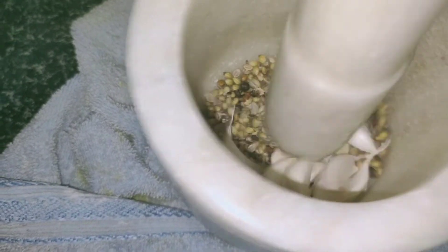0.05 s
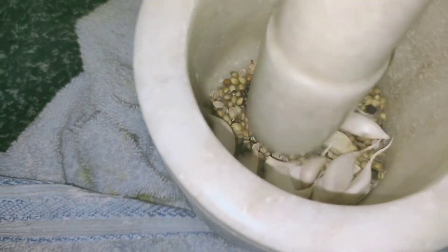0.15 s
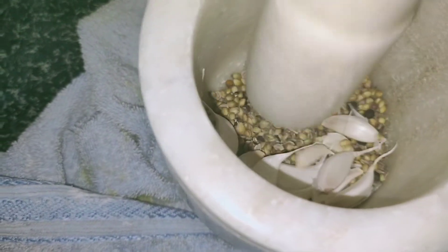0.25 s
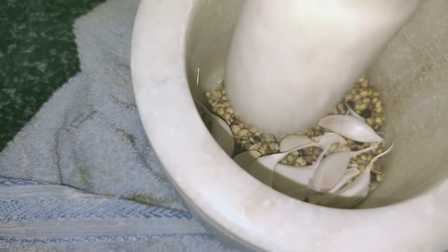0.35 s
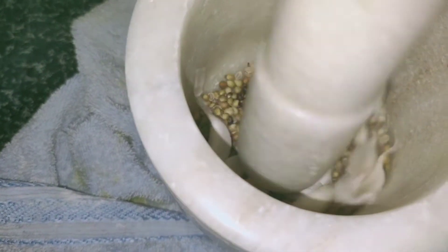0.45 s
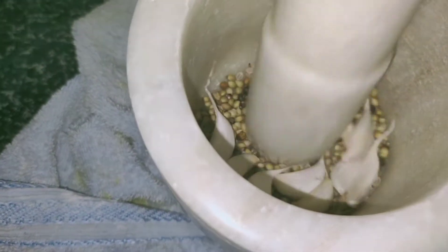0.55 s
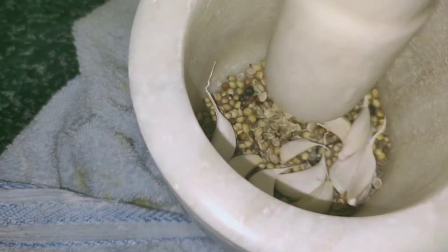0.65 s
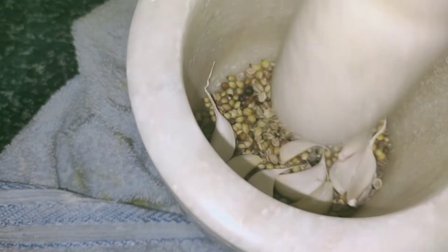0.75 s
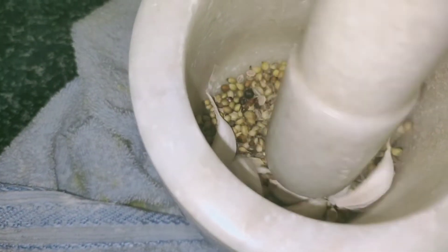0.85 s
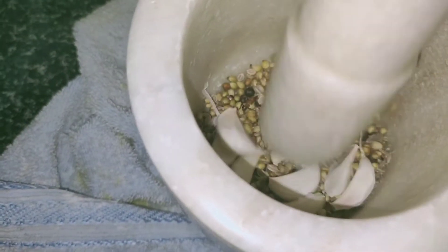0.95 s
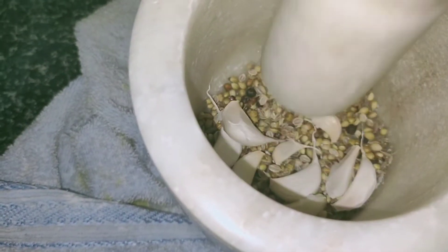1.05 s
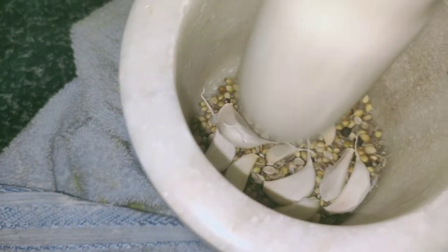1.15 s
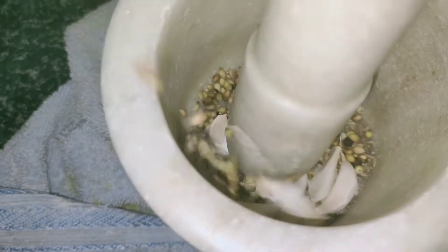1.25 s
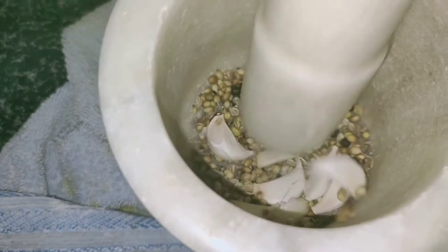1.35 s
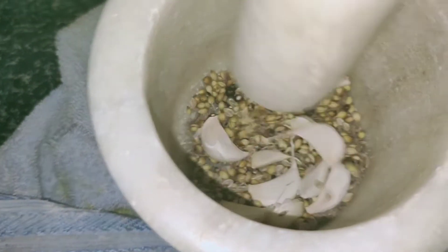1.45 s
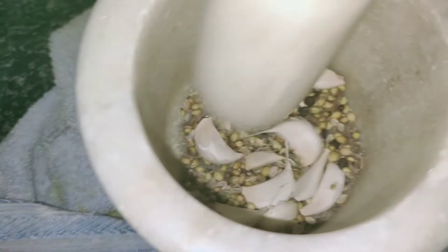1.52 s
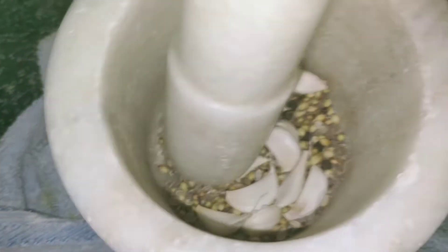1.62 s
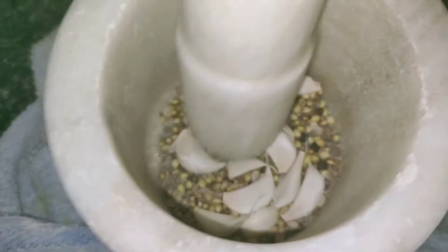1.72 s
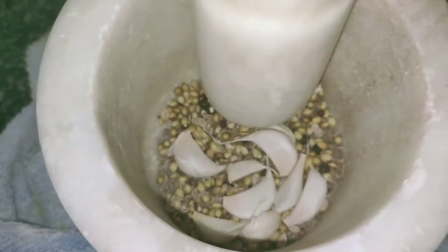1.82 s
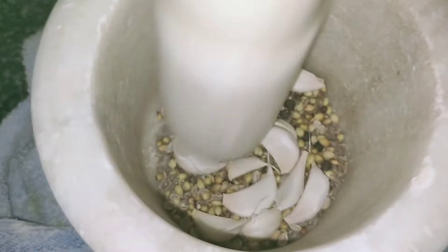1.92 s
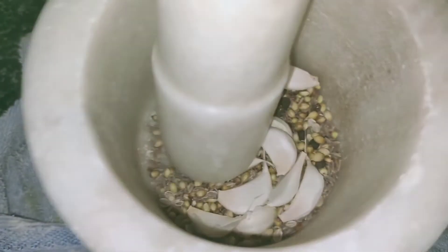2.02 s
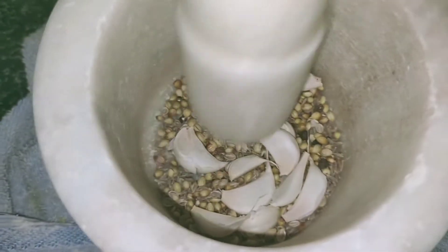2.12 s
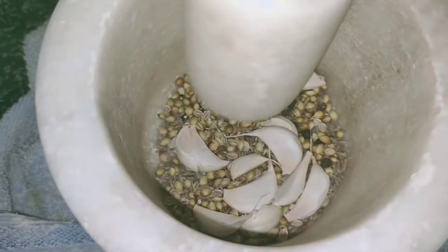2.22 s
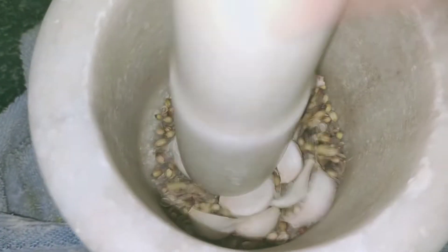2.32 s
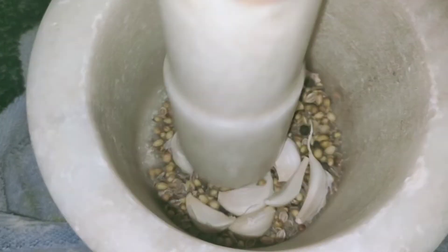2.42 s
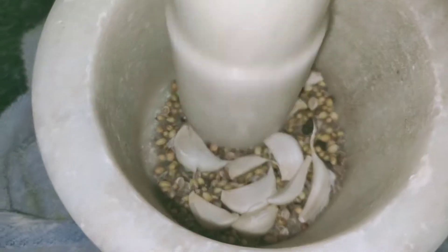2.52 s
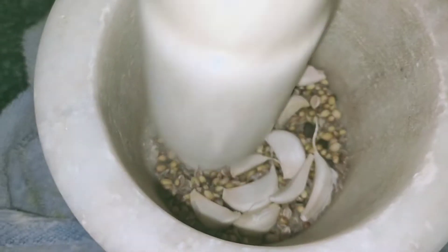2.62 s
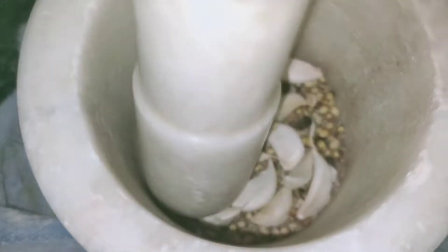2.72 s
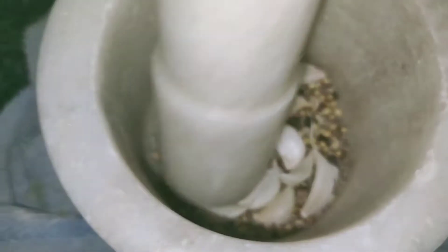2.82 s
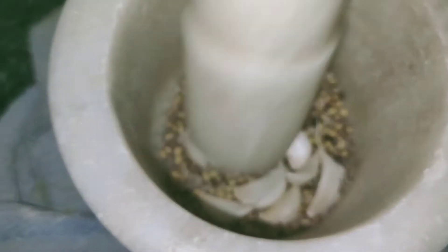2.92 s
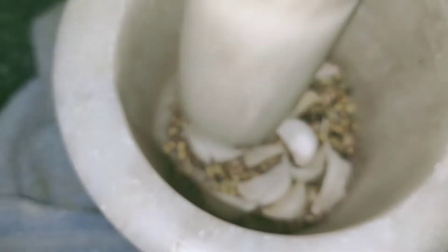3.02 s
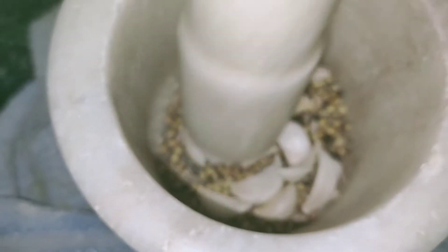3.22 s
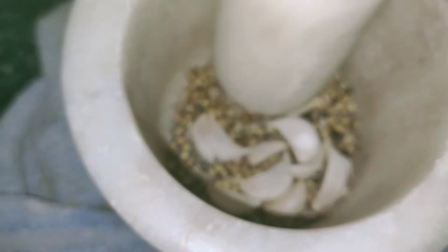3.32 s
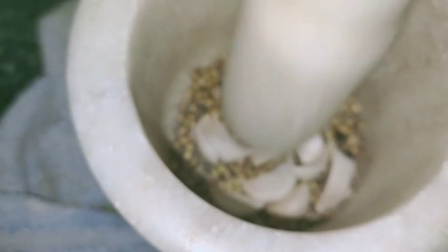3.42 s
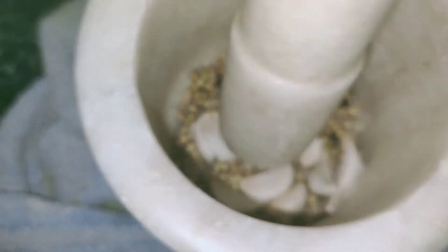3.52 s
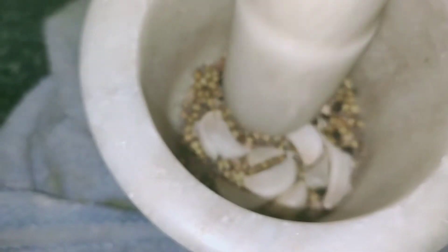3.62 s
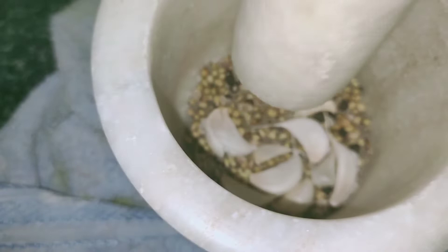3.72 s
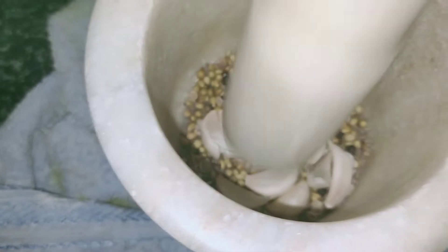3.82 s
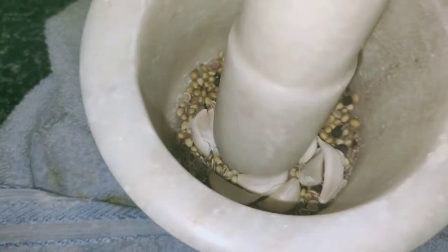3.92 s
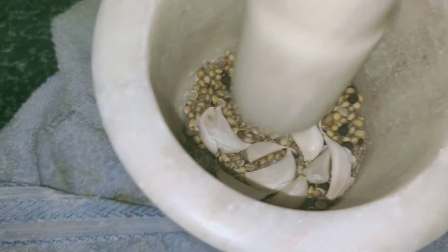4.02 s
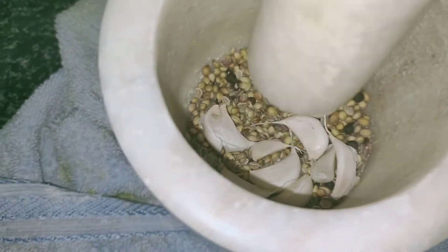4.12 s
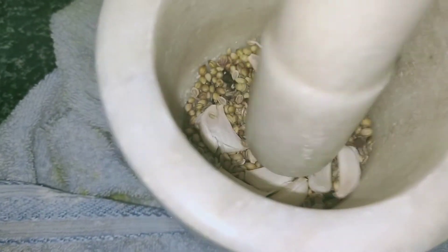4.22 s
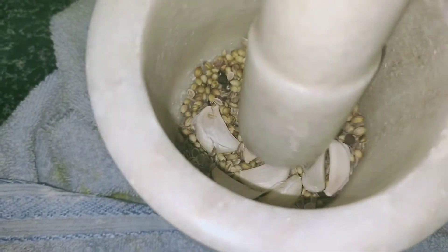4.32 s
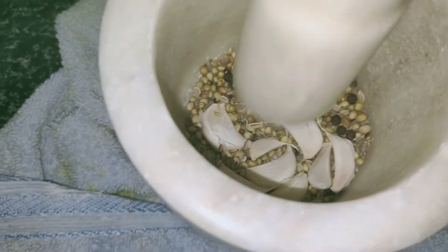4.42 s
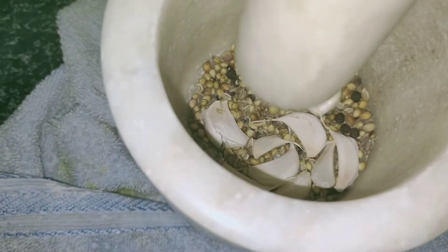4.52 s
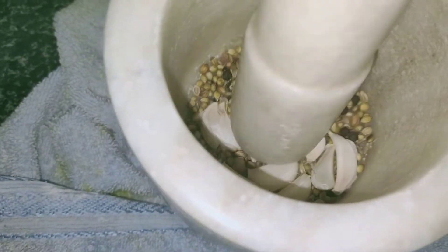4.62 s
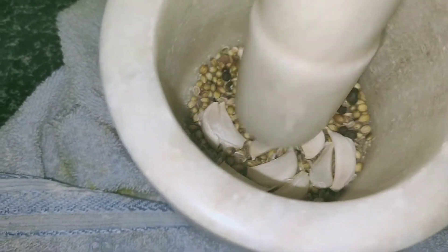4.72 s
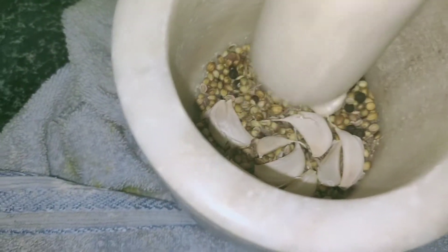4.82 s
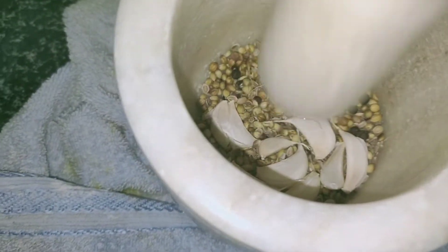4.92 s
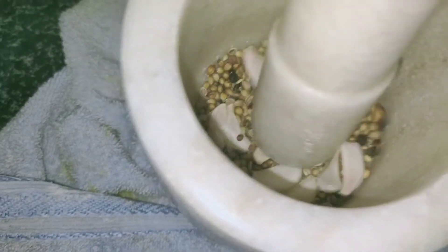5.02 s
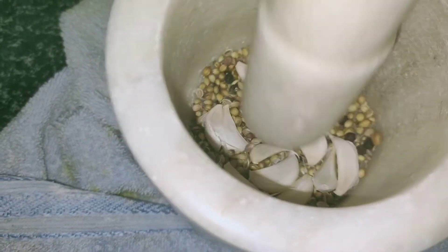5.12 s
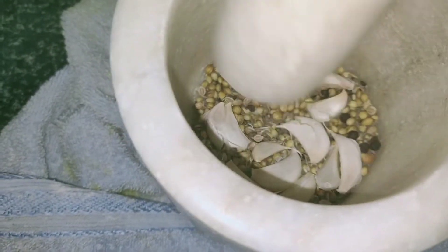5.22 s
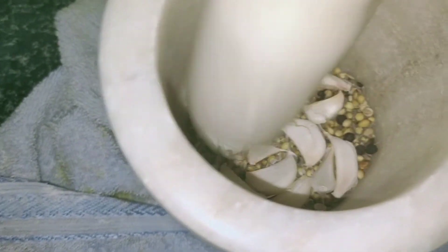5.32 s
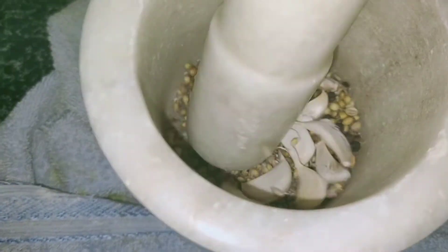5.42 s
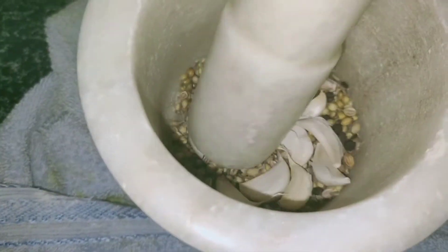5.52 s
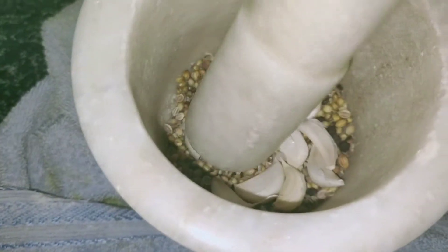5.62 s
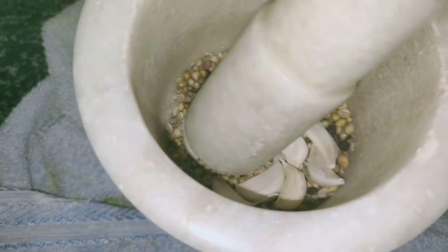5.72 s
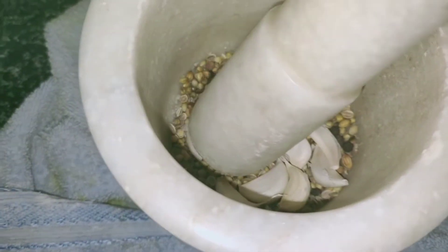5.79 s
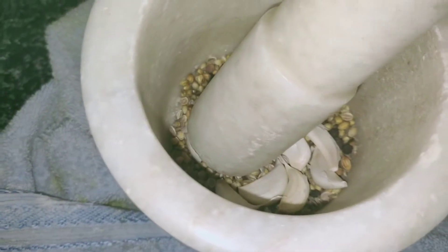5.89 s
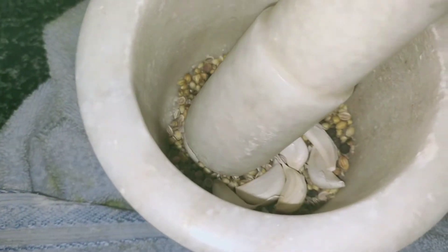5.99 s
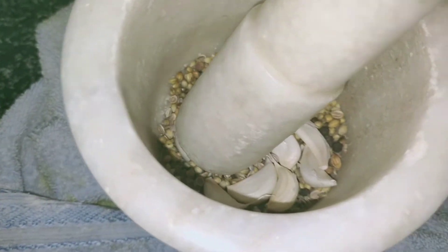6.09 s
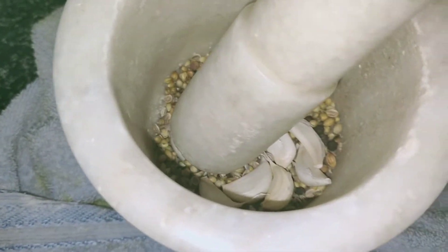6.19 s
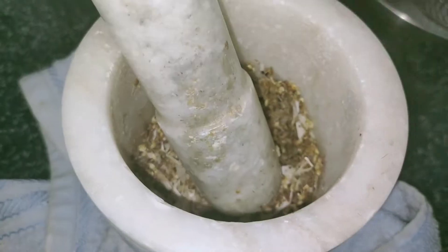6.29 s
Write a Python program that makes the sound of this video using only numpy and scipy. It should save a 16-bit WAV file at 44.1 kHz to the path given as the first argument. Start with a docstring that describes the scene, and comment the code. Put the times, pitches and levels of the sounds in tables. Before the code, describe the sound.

A stone pestle pounds dry seeds and garlic in a marble mortar, close to the microphone in a kitchen. Fourteen even blows land, nearly three a second, each a crisp crunch with a short stone tick and a low thud booming through the counter. Husks rustle faintly and stray seeds snap between blows. Near the end the pestle bounces against the bowl in a quick ringing chatter, leaving a faint room hum.

```python
"""A dry crunch and a low thud, over and over: a stone pestle pounds coriander seed, peppercorns and
garlic in a marble mortar, heard close up. Each blow cracks seeds, ticks on the stone and drives the
kitchen counter, through a towel, into a thud that booms in the room. Husks rustle between blows.
At the end the pestle is let go and chatters against the bare wall of the bowl."""
import sys
import numpy as np
from scipy import signal
from scipy.fft import rfft, irfft, next_fast_len
from scipy.io import wavfile

SR = 44100
rng = np.random.default_rng(int(sys.argv[2]) if len(sys.argv) > 2 else 0)


def unload_audio(sound):
    """Save the sound as a 16-bit wav file, at the path given as the first command line argument."""
    columns = np.transpose(np.atleast_2d(sound))
    # keep every value between -1 and 1, then stretch to whole-number steps
    steps = np.round(np.clip(columns, -1, 1) * 32767)
    wavfile.write(sys.argv[1], SR, steps.astype(np.int16))


N = 280035

# Pestle blows, timed where they bottom out: contact_s, crunch_db, thud_db, ring_db, ring_pitch_hz
BLOWS = [(0.2723, -25, -21.5, -29.5, 2070), (0.6596, -26.5, -19.5, -36, 2200),
         (1.0358, -27, -22, -32.5, 2010), (1.4198, -15.5, -21.5, -23.5, 2160),
         (1.7877, -24.5, -19, -33, 2100), (2.1567, -23, -17.5, -40.5, 1960),
         (2.5178, -23, -17.5, -32, 2075), (2.9143, -25.5, -20, -37, 2090), (3.2777, -18, -20, -36, 1920),
         (3.6745, -25, -17.5, -32, 1927), (4.039, -25.5, -22, -31, 2000), (4.4249, -24.5, -18, -35, 2030),
         (4.7981, -20, -18.5, -30, 2000), (5.1795, -20.5, -15.5, -28, 2000)]
# Bright tone of breaking seeds: frequency_hz, level_db
CRUNCH_EQ = [(150, 6), (500, -6), (900, -11), (1400, -13.5), (2500, -7.5), (3200, -2), (4200, -9),
             (6000, -2), (9000, 0), (12000, -2), (15500, -7)]
def crunch():
    """Seeds break ever harder as the pestle sinks and bottoms with a crack; crumbs then give way."""
    # pairs are (packed, loose): a loose bed of spice yields slowly and cushions the crack
    build_s, fall_s, crumble_s = (.0019, .0054), (.0016, .004), (.011, .0225)
    crack_db, crumble_db = (7, -8.5), (-24, -6)  # relative to the crunch
    t = np.arange(N) / SR
    force, settling, cracks = np.zeros((3, N))
    usual_db = np.median([blow[1] for blow in BLOWS])
    for s, db, *_ in BLOWS:
        build = bed(s, build_s) * amp(.31 * (usual_db - db))  # a harder blow sinks sooner
        envelope = np.exp(-np.maximum((s - t) / build, (t - s) / bed(s, fall_s)))
        force += amp(db) * envelope * (t > s - 3.2 * build)
        tail = np.exp(-np.abs(t - s) / bed(s, crumble_s)) * (t > s)
        settling += amp(db + bed(s, crumble_db)) * tail
        add(cracks, s - SNAP_DECAY_S / 2, snap(db + bed(s, crack_db)))
    seeds = force * grains(per_s=9300, spread_db=3.5) + cracks
    crumbs = settling * grains(per_s=500, spread_db=7)
    return coloured(seeds, CRUNCH_EQ) + coloured(crumbs, HUSK_EQ)


# The spice starts loose and the first blows pack it down: time_s, looseness (0 to 1)
LOOSENESS = [(1.05, 0.99), (1.45, 0.05)]
def bed(s, pair):
    """Blend a (packed, loose) pair by how loose the bed of spice is at time s."""
    packed, loose = pair
    return packed + np.interp(s, *np.transpose(LOOSENESS)) * (loose - packed)


SNAP_DECAY_S = .0006
def snap(db):
    """One fracture: a burst of set energy that dies at once."""
    t = np.arange(SR // 100) / SR
    return amp(db) * np.exp(-t / SNAP_DECAY_S) * rng.choice([-1, 1], len(t))


def grains(per_s, spread_db):
    """Tiny fractures at random moments and of uneven size, rms 1."""
    breaks = (rng.random(N) < per_s / SR) * rng.choice([-1, 1], N)
    sizes = amp(spread_db * np.clip(rng.standard_normal(N), -2, 2))
    return unit(breaks * sizes)


# Boom of counter and room: pitch_hz, level_db, t60_s, arrival_s
BOOM_MODES = [(65, -22, .38, .035), (74.5, -21, .38, .058), (87.5, -21.5, .4, .025),
              (102.8, -10, .23, .0667), (135, -14, .15, .022), (178, -6, .04, .0087), (241, -27, .42, .029),
              (296, -21.5, .38, .027)]
# Dull tone of the shuddering counter: frequency_hz, level_db
SHUDDER_EQ = [(25, -21), (60, -0.5), (140, -4), (330, -6), (480, -15), (750, -12.5), (1000, -28),
              (1800, -25), (3000, -39.5)]
def thuds():
    """The towel passes each blow to the counter, which swings, shudders and wakes low room modes."""
    counter_hz, swing_peak_s, towel_delay_s, shudder_peak_s = 90, .0123, .006, .036
    t = np.arange(SR // 2) / SR
    age = np.maximum(t - towel_delay_s, 0)
    swing = age / swing_peak_s * np.exp((1 - (age / swing_peak_s) ** 2) / 2)
    thud = swing * np.sin(2 * np.pi * counter_hz * age)
    for hz, db, t60, arrival in BOOM_MODES:
        age = np.maximum(t - arrival, 0)
        attack = 1 - np.exp(-age / .005)
        thud += amp(db - 60 * age / t60) * attack * np.sin(2 * np.pi * hz * age)
    shudder = amp(-27) * t / shudder_peak_s * np.exp(1 - t / shudder_peak_s)
    track = np.zeros((2, N))
    for s, _, thud_db, *_ in BLOWS:
        add(track, s, amp(thud_db) * (thud + shudder * wide_noise(SHUDDER_EQ, len(t))))
    return track


# The pestle grazes the stone again as it starts to lift: start_s, level_db
LIFT_TAPS = [(2.2587, -48.5), (3.0134, -44.5)]
# Tone of a knock through the spice: frequency_hz, level_db
CUSHION_EQ = [(500, -13), (850, -4), (1250, -9), (1950, 5.5), (2300, 3), (3100, -3), (6000, -9)]
def knocks():
    """Stone meets stone through the spice: a short tick, damped and slightly detuned by the grip."""
    main_mode_hz = 1955
    blows = [(s, db, ring_hz / main_mode_hz) for s, *_, db, ring_hz in BLOWS]
    taps = [(s, db, 1) for s, db in LIFT_TAPS]
    track = np.zeros(N)
    for s, db, tuning in blows + taps:
        ring = stone_ring(cutoff_hz=2600, tuning=tuning, rim_db=-6, grip_db_per_s=400, spread_db=1.5)
        add(track, s, amp(db) * ring)
    return placed(coloured(track, CUSHION_EQ), left_lag_ms=.12)


# Pestle bounces on bare stone: start_s, level_db, cutoff_hz, rim_db
BOUNCES = [(5.3791, -8, 8000, 0), (5.4110, -14, 2200, 2), (5.4414, -20, 1800, 0), (5.4644, -22.5, 1900, 15),
           (5.4838, -26.5, 1800, 0)]
def chatter():
    """The released pestle bounces on the wall, ever sooner and weaker, nearer the right microphone."""
    track = np.zeros(N)
    for s, db, cutoff_hz, rim_db in BOUNCES:
        ring = stone_ring(cutoff_hz, tuning=1, rim_db=rim_db, grip_db_per_s=0, spread_db=.5)
        add(track, s, amp(db) * ring)
    return placed(track, left_lag_ms=.18) * amp([[-3], [-1]])


# Ring of mortar and pestle: pitch_hz, level_db, t60_s
STONE_MODES = [(400, -17, .014), (580, -15, .012), (805, -7, .015), (850, -21, .07), (1125, -27, .08),
               (1250, 5, .003), (1955, -2, .031), (2070, -20, .04), (3100, -13, .004), (3445, -19, .035),
               (4231, -19.5, .07), (7144, -26, .05), (10080, -23, .045), (11620, -27, .035)]
def stone_ring(cutoff_hz, tuning, rim_db, grip_db_per_s, spread_db):
    """One contact rings the stone; a soft one misses the high modes, and a gripping hand damps it."""
    t = np.arange(SR // 4) / SR
    hz, db, t60 = np.transpose(STONE_MODES)[:, :, None]
    db = db + rim_db * (hz > 3800)  # the high modes belong to the rim and answer contacts near it
    strength = amp(db + spread_db * rng.standard_normal(hz.shape)) / np.hypot(1, (hz / cutoff_hz) ** 2)
    polarity = np.where(t60 < .005, 1, -1)  # the brief contact push opposes the wall's rebound
    decay = amp(-60 * t / t60 - grip_db_per_s * t)
    ring = np.sum(polarity * strength * decay * np.sin(2 * np.pi * hz * tuning * t), axis=0)
    attack = 1 - np.exp(-(2 * cutoff_hz * t) ** 2)
    return ring * attack


# Garlic cloves shifting or splitting: peak_s, half_length_s, level_db
CLOVES = [(0.01, 0.065, -54.5), (1.028, 0.002, -19.5), (1.211, .045, -49), (1.365, 0.012, -52.5)]
# Single seeds that snap out loud: start_s, level_db
SEED_SNAPS = [(.888, -38.5), (1.546, -41), (1.5875, -36.5), (1.859, -30), (2.2587, -26.5), (2.5026, -26),
              (2.6294, -30.5), (2.6438, -32), (2.673, -27.5), (3.0117, -29), (3.3875, -35), (5.376, -24)]
# Papery tone of husks and crumbs: frequency_hz, level_db
HUSK_EQ = [(500, -27.5), (2500, -7.5), (4200, -13.5), (6500, -7.5), (9500, -3), (12000, -10.5), (15500, -1)]
# Thin hiss of stone rubbing: frequency_hz, level_db
RUB_EQ = [(3000, -43.5), (5500, -33), (6500, 4.5), (7700, -12), (8800, 2), (10000, -18), (12000, -24)]
def husks():
    """Skins rustle and stray seeds snap at each lift; cloves shift, and the resting pestle rubs."""
    lift_after_s, stray_spread_s = .115, .034
    rustle_db = (-64, -49.5)  # packed, loose
    stir = sum(swell(*clove) for clove in CLOVES)
    snaps = np.zeros(N)
    for s, *_ in BLOWS:
        lift = s + lift_after_s
        stir += swell(lift, half_s=.035, db=bed(s, rustle_db))
        for when, strength in rng.standard_normal((3, 2)):  # three stray seeds a lift
            add(snaps, lift + when * stray_spread_s, snap(db=-42 + 4 * strength))
    for s, db in SEED_SNAPS:
        add(snaps, s, snap(db))
    rub = swell(5.75, half_s=.27, db=-74) * noise(RUB_EQ, N)
    skins = stir * grains(per_s=600, spread_db=7)
    return coloured(skins + snaps, HUSK_EQ) + rub


# Tone of the crackle spilling from the bowl: frequency_hz, level_db
SPILL_EQ = [(300, -10.5), (900, -3), (1500, -7.5), (3000, 0.5), (4200, -10), (6000, -1), (9000, 4.5),
            (12000, -1), (15500, -3)]
def bowl_spill(x):
    """Crackle leaves the bowl by many paths: its energy is kept, smeared over some milliseconds."""
    smear = np.hanning(500)
    power = signal.fftconvolve(x ** 2, smear / smear.sum())[:N]
    return np.sqrt(np.abs(power)) * np.array([noise(SPILL_EQ, N), noise(SPILL_EQ, N)])


# Short reverb of the kitchen: frequency_hz, t60_s
KITCHEN_DECAY = [(100, .4), (800, 0.26), (3000, 0.32), (8000, 0.32), (15000, 0.23)]
def kitchen_echo(x, blocks=17):
    """Diffuse echo of the hard walls; each block gets a fresh tail, as the microphones drift."""
    wet, size = np.zeros((2, N)), N // blocks + 1
    for start in range(0, N, size):
        hz, t, bands = signal.stft(rng.standard_normal((2, SR // 2)), SR, nperseg=256)
        envelope = amp(-60 * t / along(KITCHEN_DECAY, hz)[:, None]) * (1 - np.exp(-t / .004))
        tail = signal.istft(bands * envelope, SR, nperseg=256)[1]
        tail /= np.linalg.norm(tail[0])
        add(wet, start / SR, signal.fftconvolve(x[:, start:start + size], tail, axes=1))
    return wet


# Dark tone of the room's air: frequency_hz, level_db
AIR_EQ = [(20, -14), (45, 2), (75, 5), (150, -6), (200, -6.5), (290, 5.5), (420, -2.5), (650, -10.5),
          (1200, -13), (2000, -16), (2600, -24), (3500, -52.5), (8000, -47.5), (12000, -54.5)]
def room_tone():
    """A steady low rush of air with a faint appliance hum."""
    t = np.arange(N) / SR
    hum = amp(-58.5) * np.sin(2 * np.pi * 101 * t) + amp(-70) * np.sin(2 * np.pi * 300 * t)
    return amp(-57.5) * wide_noise(AIR_EQ, N) + hum


def amp(db):
    """Decibels to gain."""
    return 10 ** (np.asarray(db) / 20)


def unit(x):
    """x at rms 1."""
    return x / np.sqrt(np.mean(x ** 2) + 1e-20)


def along(points, hz):
    """Read a (frequency_hz, value) curve on a log frequency axis."""
    frequencies, values = np.transpose(points)
    return np.interp(np.log(hz + 1), np.log(frequencies + 1), values)


def add(track, s, x):
    """Mix x into the track at time s."""
    start = max(round(s * SR), 0)
    part = track[..., start:start + x.shape[-1]]
    part += x[..., :part.shape[-1]]


def swell(s, half_s, db):
    """A smooth rise and fall of level around time s."""
    return amp(db) * np.exp(-((np.arange(N) / SR - s) / half_s) ** 2)


def filtered(x, response):
    """x through a complex frequency response."""
    n = x.shape[-1]
    padded = next_fast_len(n + 8192)
    return irfft(rfft(x, padded) * response(np.fft.rfftfreq(padded, 1 / SR)), padded)[..., :n]


def coloured(x, eq, size=2048):
    """x through a minimum-phase EQ, so nothing rings ahead of an attack."""
    cepstrum = irfft(np.log(amp(along(eq, np.fft.rfftfreq(size, 1 / SR)))))
    fold = 1 + np.sign(size // 2 - np.arange(size))
    fold[0] = 1
    impulse = irfft(np.exp(rfft(cepstrum * fold)))
    return signal.fftconvolve(x, impulse)[:len(x)]


def noise(eq, n):
    """Noise of rms 1 shaped by an EQ curve."""
    return unit(filtered(rng.standard_normal(n), lambda hz: amp(along(eq, hz))))


def wide_noise(eq, n):
    """Stereo noise with the side 4 dB under the mid."""
    return noise(eq, n) + amp(-4) * noise(eq, n) * np.array([[1], [-1]])


def placed(x, left_lag_ms):
    """x at the two microphones, the left one later."""
    delays_s = np.array([[.5], [-.5]]) * left_lag_ms / 1000
    return filtered(x, lambda hz: np.exp(-2j * np.pi * hz * delays_s))


def scene():
    """Spice and stone up front, the counter's thud below, the kitchen behind."""
    spice = crunch() + husks()
    stone = knocks() + chatter()
    spill = bowl_spill(spice)
    echo = kitchen_echo(amp(-14) * spill + amp(-14.5) * stone)
    return placed(spice, left_lag_ms=.097) + amp(-11.5) * spill + stone + echo + thuds() + room_tone()


# Colour of the left microphone port: frequency_hz, level_db
LEFT_PORT_EQ = [(400, 4), (800, 7.5), (2000, 3), (4200, 3), (5500, 10), (6700, 10), (8000, -0.5),
                (9500, -9), (12500, -6.5), (15500, 1.5)]
# Colour of the right microphone port: frequency_hz, level_db
RIGHT_PORT_EQ = [(400, 4), (800, 7), (2000, 3), (4200, 6.5), (6500, -4), (7600, 4.5), (8700, 12),
                 (10000, 3), (12000, -0.5), (15500, 2.5)]
def record(dry):
    """Each microphone port has its own treble resonance; the sound stops shortly before the end."""
    stop_s, top_hz = 6.122, 15800
    ports = np.array([coloured(dry[0], LEFT_PORT_EQ), coloured(dry[1], RIGHT_PORT_EQ)])
    gate = np.clip((stop_s - np.arange(N) / SR) / .005, 0, 1)
    return filtered(ports * gate, lambda hz: 1 / (1 + (hz / top_hz) ** 80))


dry = scene()
out = record(dry)
unload_audio(out)
```